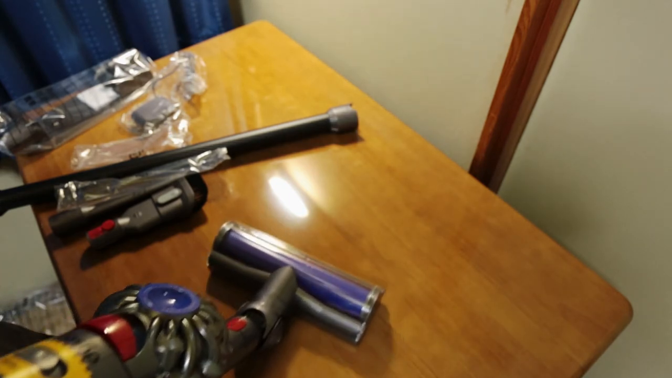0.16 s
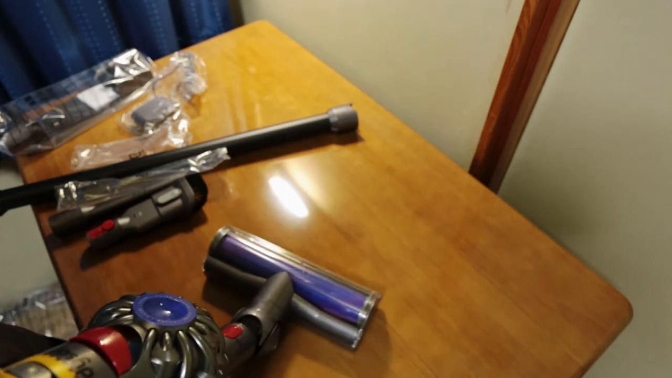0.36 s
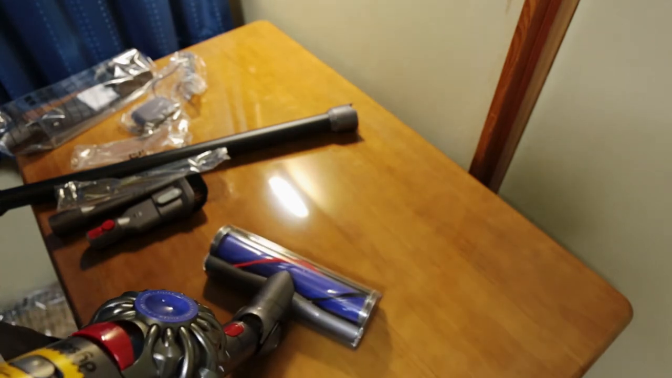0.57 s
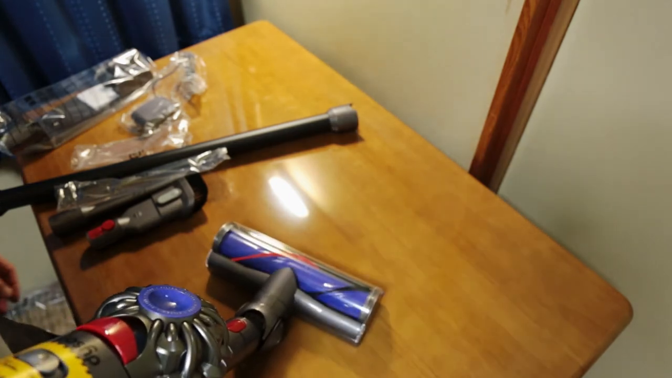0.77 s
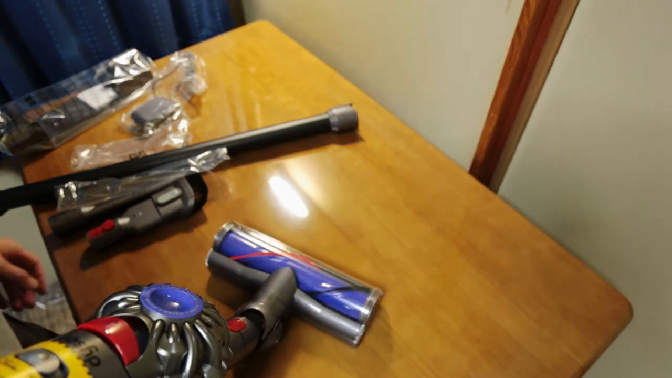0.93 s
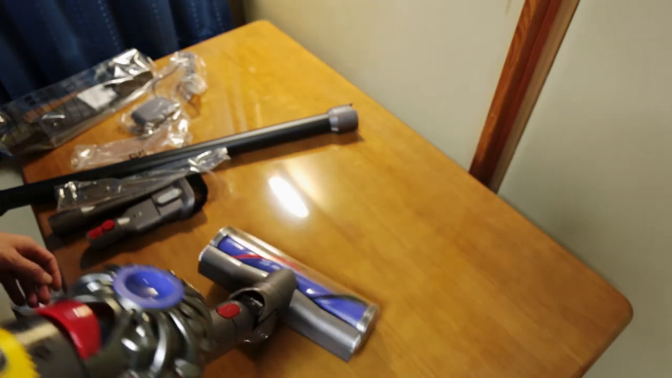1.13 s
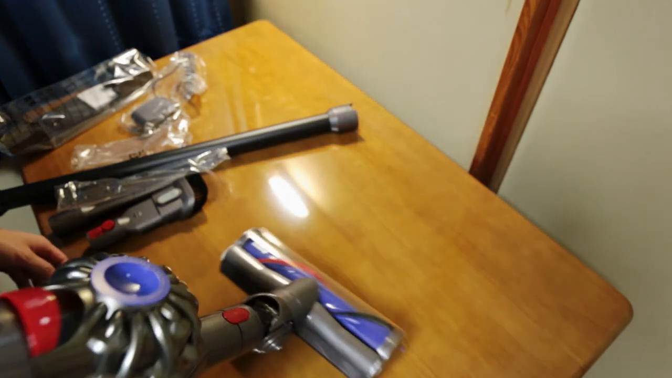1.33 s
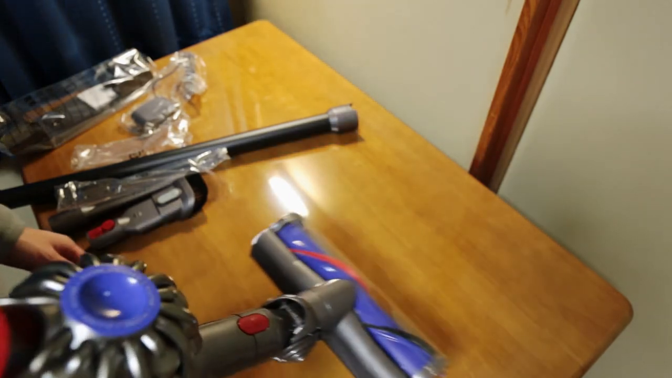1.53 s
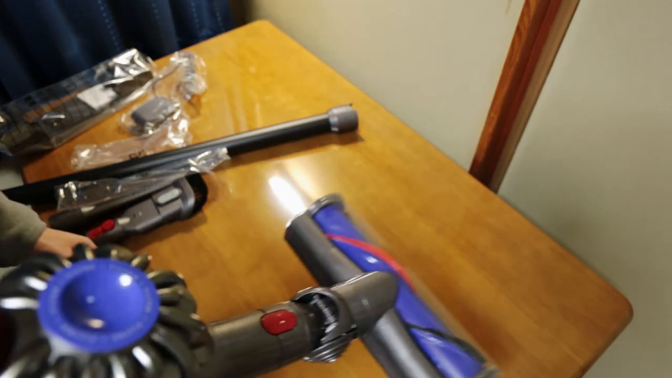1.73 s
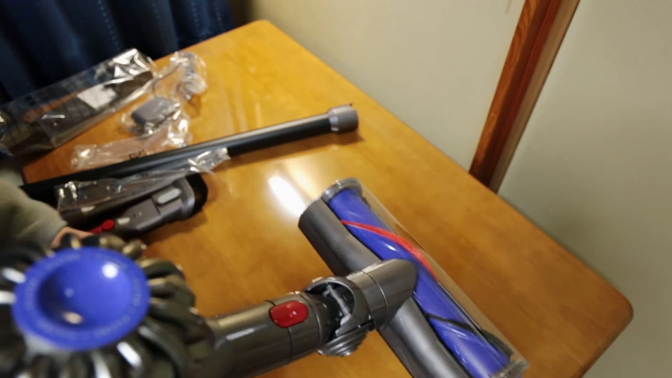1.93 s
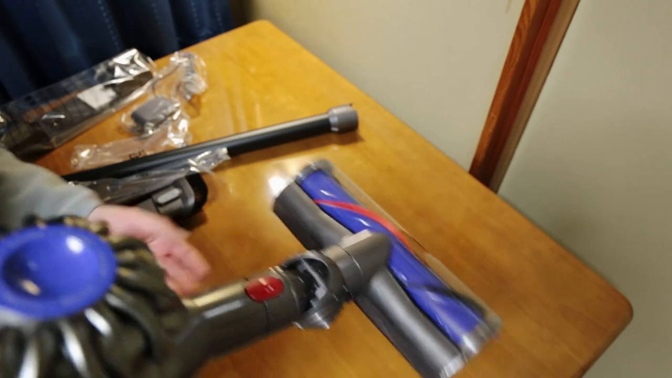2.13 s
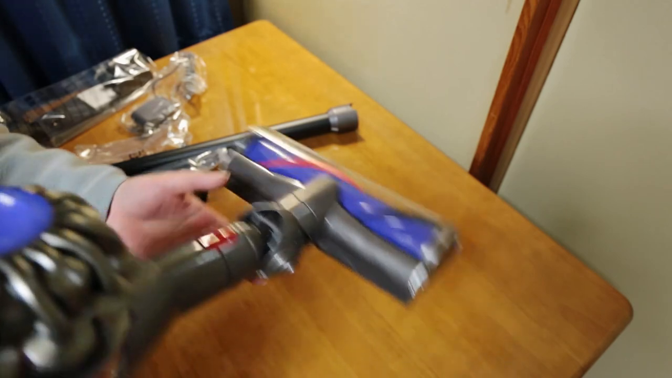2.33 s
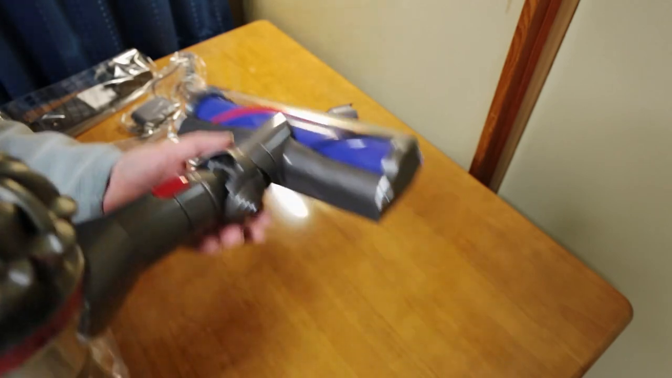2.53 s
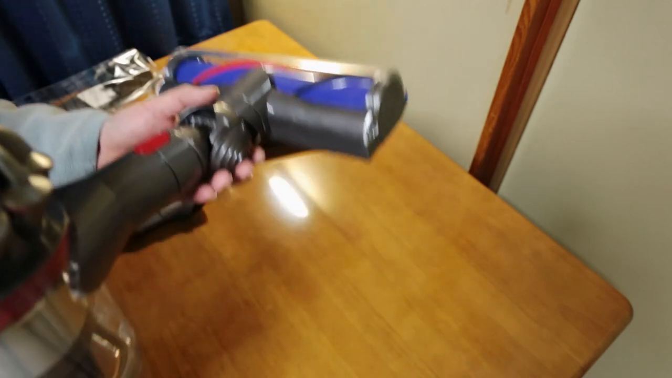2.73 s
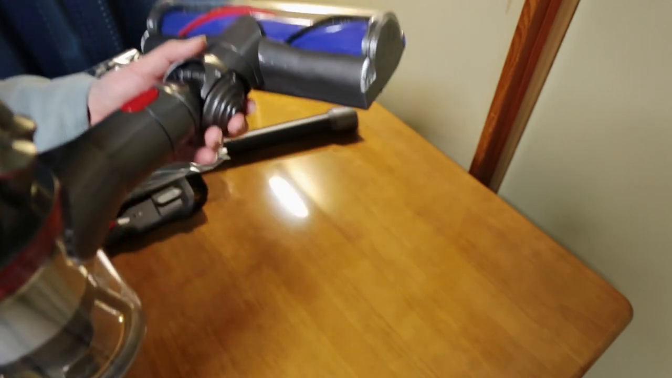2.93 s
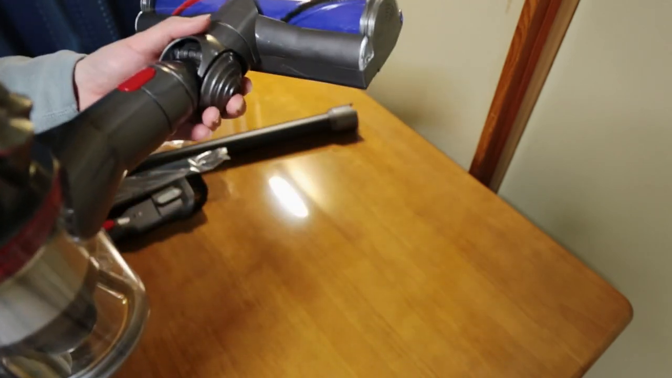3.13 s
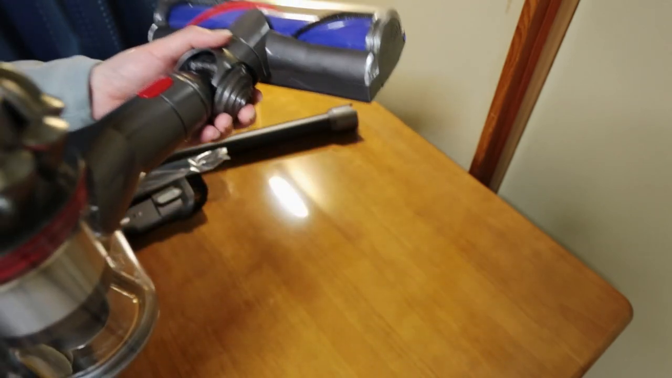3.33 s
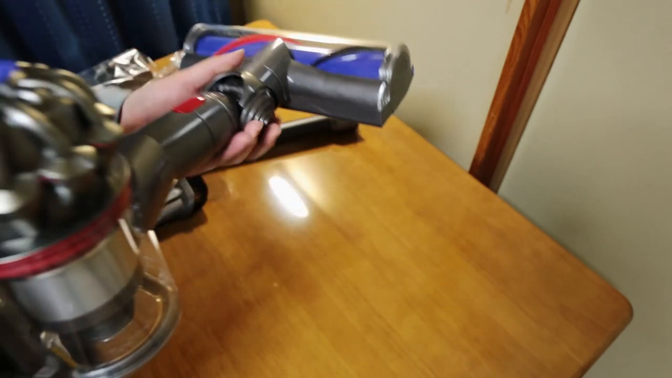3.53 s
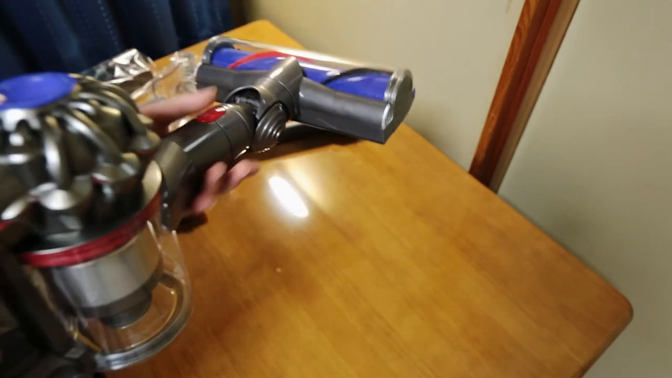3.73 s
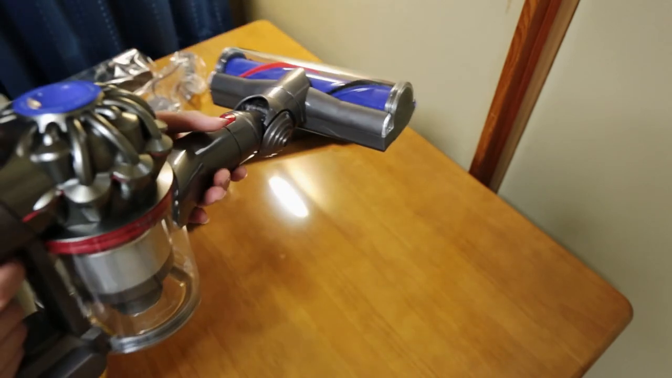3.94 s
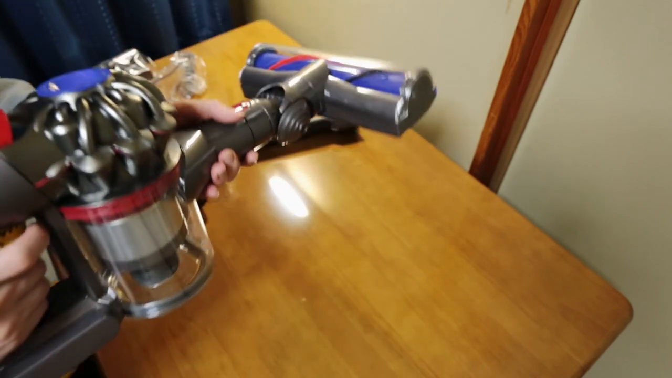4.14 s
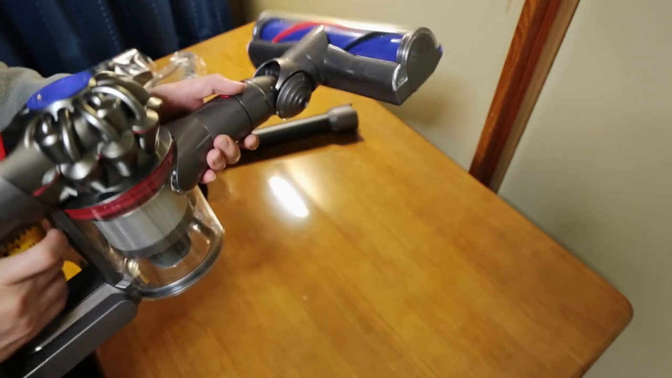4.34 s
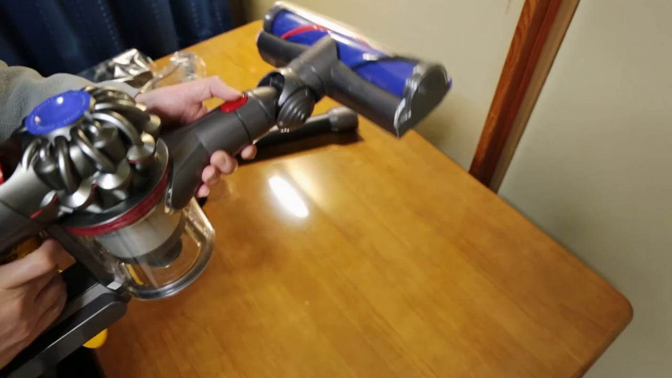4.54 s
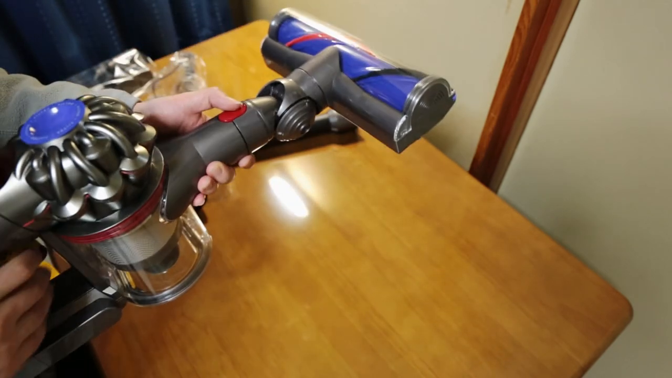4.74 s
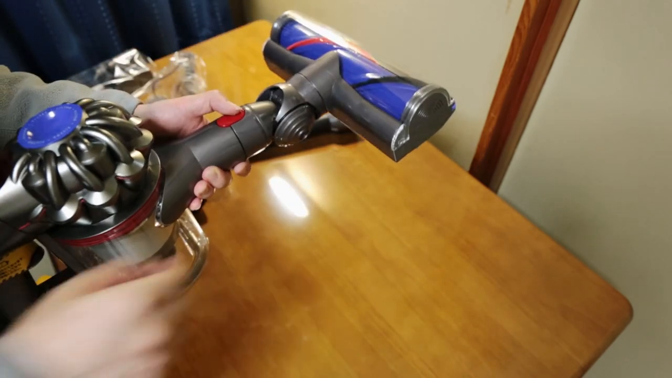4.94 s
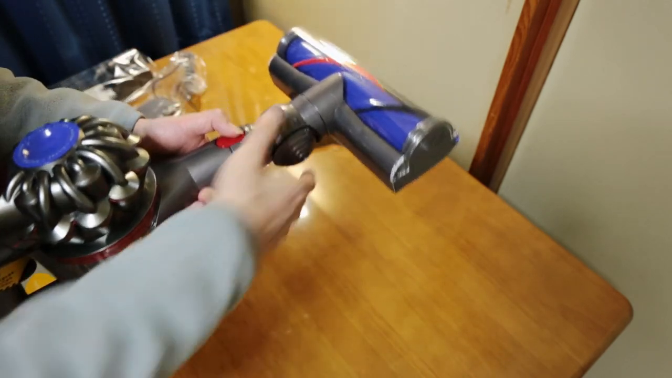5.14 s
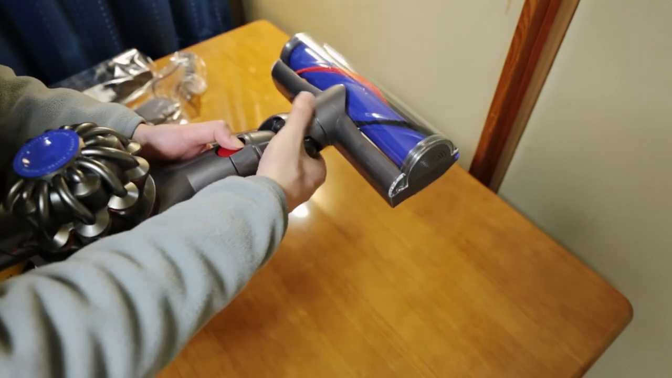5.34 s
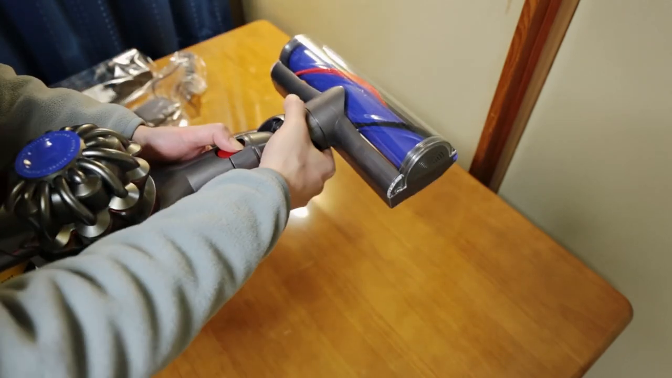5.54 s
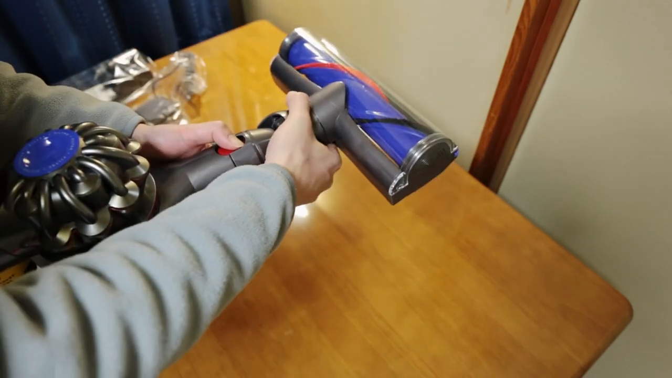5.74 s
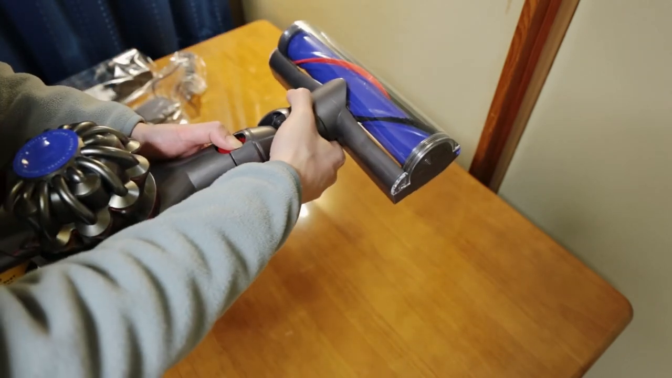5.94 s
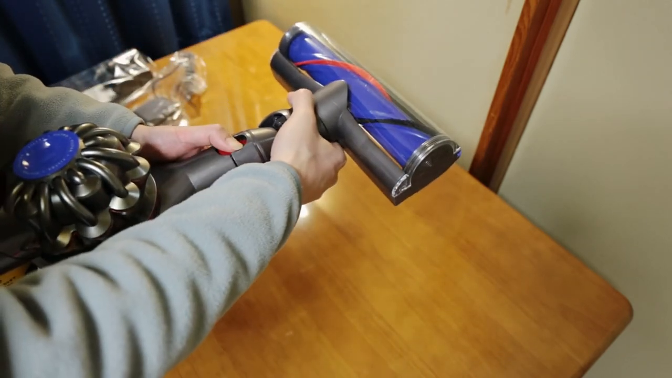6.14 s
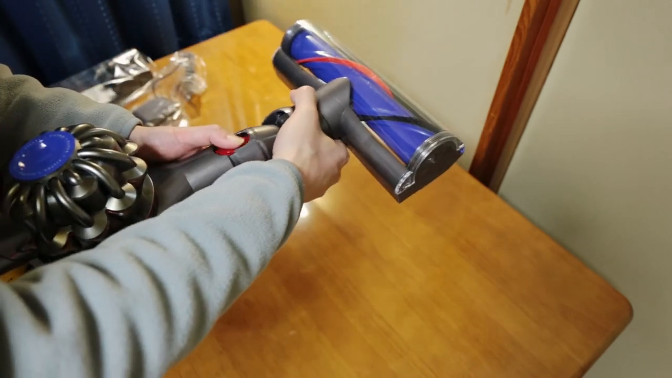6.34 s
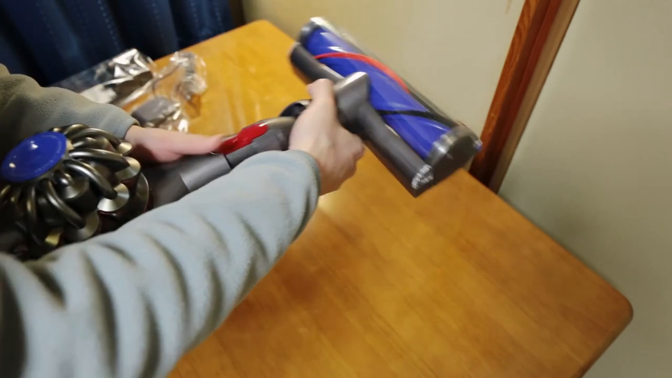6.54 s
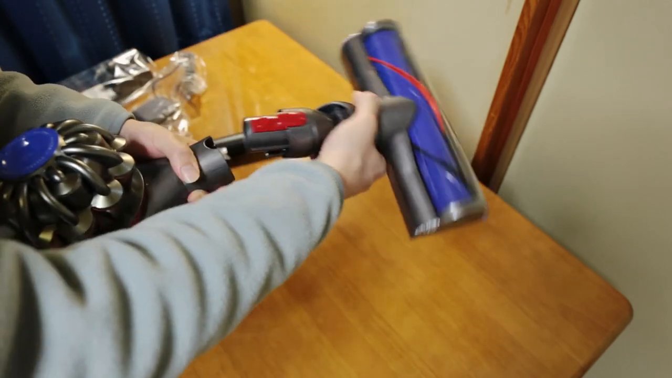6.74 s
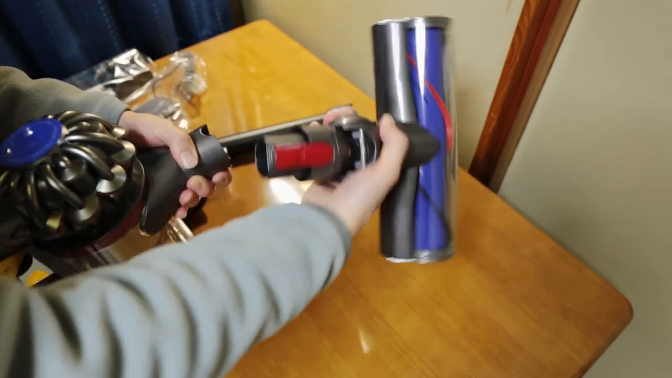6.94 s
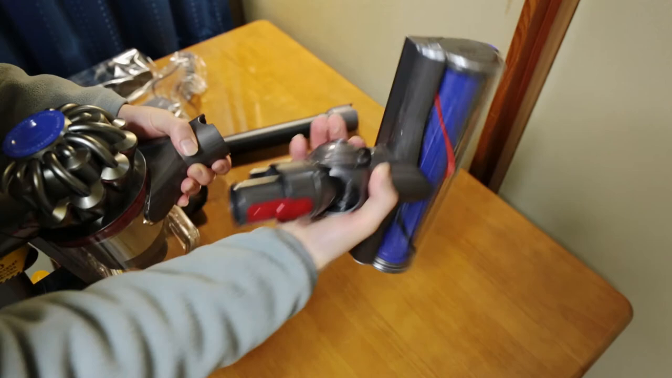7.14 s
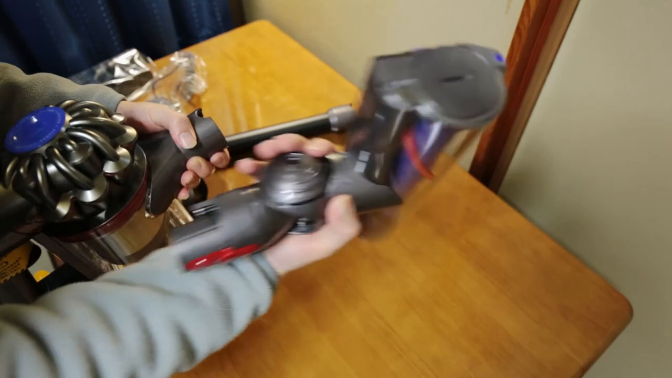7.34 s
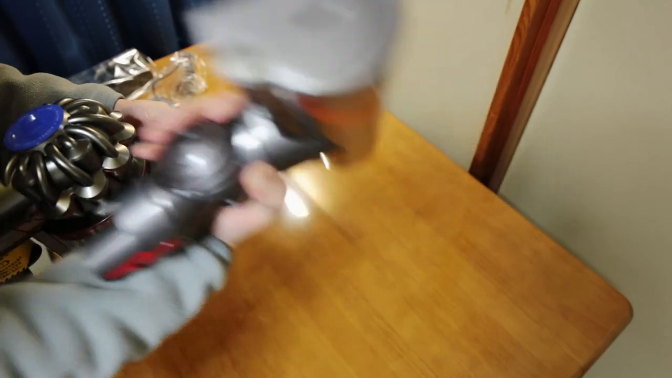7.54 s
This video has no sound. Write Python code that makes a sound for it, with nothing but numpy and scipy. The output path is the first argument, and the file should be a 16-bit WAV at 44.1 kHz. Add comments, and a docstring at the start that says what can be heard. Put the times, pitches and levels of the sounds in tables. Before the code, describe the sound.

Heard up close in a small room, the whine and airy rush of a stick vacuum cut off and fall in pitch, dying away in about a second. After a brief rub of fingers, the plastic neck clacks loudly, then creaks as it twists. Scattered light taps and soft handling bumps lead to two short bursts of clicking, the last with a scrape as the floor head comes off.

```python
"""A cordless stick vacuum whines and rushes over a wooden table in a small room, then is switched off
and glides down to a stop. Fan and gears make the tones, turbulence in the ducts the rush of air.
Fingers slide over the plastic shell in tiny slips, the swivel neck clacks and creaks as the floor head
is lifted, and the head is unlatched and pulled off, each knock briefly ringing the hollow housing."""
import sys
import numpy as np
from scipy import signal
from scipy.fft import rfft, irfft, next_fast_len
from scipy.io import wavfile

SR = 44100
rng = np.random.default_rng(int(sys.argv[2]) if len(sys.argv) > 2 else 0)


def waveform_to_disk(signal):
    """Save audio, clipped to [-1, 1], as 16-bit WAV at the path in sys.argv[1]."""
    frames = np.transpose(np.atleast_2d(signal))
    scaled = np.clip(frames, -1, 1) * 32767
    samples = np.round(scaled).astype(np.int16)
    wavfile.write(sys.argv[1], SR, samples)


N = 334719
TIME = np.arange(N) / SR

# The bright hiss of rubbing skin or bristles. Each row: frequency in Hz, relative density in dB.
FRICTION_HISS = [(200, -50), (3500, -5.5), (5500, -6.5), (7000, -4), (9000, 1.5), (12000, -8.5),
                 (16000, -12)]


def motor():
    """Fan and gears whine under power; with the drive cut, the rotor's coasting tones take over."""
    # Fan tones. Each row: multiple of the shaft rate, level in dB.
    fan_orders = [(1, -35.5), (2, -72), (3, -52.5), (4, -52), (5, -45), (7, -29), (8, -39.5), (14, -45)]
    shaft = shaft_rate()
    driven = np.interp(TIME, [.235, .275], [1, 0])
    fan = tones(shaft, fan_orders, waver_db=-2.9) * driven
    return fan + gear_whine(driven) + coasting_rotor(shaft, driven)


def gear_whine(driven, fade_power=0.51, unloaded_db=-19):
    """Meshing teeth whine, drop in level once unloaded and fade as the brush bar slows."""
    # Gear tones and sidebands. Each row: multiple of the brush rate, level under power in dB.
    gear_orders = [(1, -49), (6.08, -40.5), (9.7, -38.5), (13, -47), (14, -39.5), (23.5, -72), (24, -25.5),
                   (25, -23.5), (25.5, -43.5), (26, -31.5), (26.44, -34.5), (27, -33.5), (27.46, -37),
                   (45.46, -42), (58.78, -45)]
    brush = brush_rate()
    # the teeth bite hardest once a turn, so their sidebands swell together
    whine = tones(brush, gear_orders, waver_db=1.5, phase_spread=1.0)
    slowing = (brush / brush[0]) ** fade_power
    return whine * slowing * from_db(unloaded_db * (1 - driven)) * np.interp(TIME, [.55, .62], [1, 0])


def coasting_rotor(shaft, driven):
    """A few partials of the freewheeling rotor glide down through the peaks and dips of the housing and the
    room."""
    # Rotor partials. Each row: multiple of the shaft rate, relative level in dB, favoured speed in
    # turns per second, loss in dB per octave away from that speed.
    rotor_orders = [(1, -33.5, 450, 11.5), (4, -32, 120, 1.5), (7, -36, 550, 9), (12, -31.5, 111, 36)]
    # Peaks and dips of the housing and the room. Each row: frequency in Hz, gain in dB.
    coast_response = [(160, -26), (250, -27), (310, -0.5), (355, -13.5), (395, -6.5), (430, -10), (475, 3),
                      (560, -11), (780, -13.5), (990, -7.5), (1300, -14), (1650, -19), (2250, -10), (2650, -4),
                      (3700, -14), (4080, 7), (4450, -12), (6100, -12)]
    rotor = 0
    for order, db, best_hz, loss_db in rotor_orders:
        octaves_away = np.abs(np.log2((shaft + 1) / best_hz))
        gain = from_db(at_hz(coast_response, order * shaft) - loss_db * octaves_away)
        rotor = rotor + tones(shaft, [(order, db)], waver_db=4.5) * gain
    coasting = (1 - driven) * np.interp(TIME, [1.1, 1.2], [1, 0])
    return room(rotor * coasting, wet_db=-14)


def shaft_rate(full_hz=872.2, drag_hz=269.1, coast_s=.7864, stop_s=1.247):
    """Full speed, then a coast: air drag brakes the rotor above drag_hz, bearing friction below it."""
    angle = np.clip((stop_s - TIME) / coast_s, 0, np.arctan(full_hz / drag_hz))
    return drag_hz * np.tan(angle)


def brush_rate(full_hz=87.65, switch_off_s=.24, stop_s=.63):
    """After switch-off the brush bar is braked evenly by its gears."""
    return np.interp(TIME, [switch_off_s, stop_s], [full_hz, 0])


def air(split_hz=900, gust_db=2.74):
    """Turbulence in the ducts: the hiss dies sooner than the low roar."""
    # Rushing air with the duct's resonances. Each row: frequency in Hz, relative density in dB.
    duct_colour = [(30, -7), (60, -30), (87, -6), (120, -27), (150, -4.5), (175, -21), (212, -1),
                   (250, -13.5), (305, -8), (510, -4.5), (590, -12), (670, -9), (760, -18), (870, -14),
                   (1230, -10.5), (1750, -13), (2200, -7.5), (2550, -14.5), (4100, -15.5), (5400, -21.5),
                   (6300, -17.5), (7400, -19), (9800, -18), (15800, -31.5)]
    # The air flow dying away. Each row: time in seconds, roar gain in dB, hiss gain in dB.
    flow = [(0, -20, -21.5), (.27, -20.5, -23), (.33, -24, -28), (.44, -19.5, -32), (.56, -32.5, -43.5),
            (.67, -37, -51.5), (.8, -40.5, -52.5), (1.1, -62, -69), (1.4, -80, -94)]
    times, roar_db, hiss_db = np.transpose(flow)
    rush = noise(duct_colour)
    roar_gain = from_db(np.interp(TIME, times, roar_db) + gust_db * drift(39.9))
    hiss_gain = from_db(np.interp(TIME, times, hiss_db))
    roar = band(rush, split_hz, "low", order=3) * roar_gain
    return roar + band(rush, split_hz, "high", order=3) * hiss_gain


def floor_head(bristle_focus=6.2, swish_db=-37, ring_db=-45):
    """The bristles swish once a turn, ever slower, while one mode of the housing sings along."""
    brush = brush_rate()
    strokes = np.abs(np.sin(np.pi * np.cumsum(brush) / SR)) ** bristle_focus * (brush > 0)
    swish = noise(FRICTION_HISS) * strokes * swell(peak_s=0.48, rise_s=0.18, fall_s=0.32)
    ring = narrow_noise(hz=1680, width_hz=70) * swell(peak_s=0.56, rise_s=.22, fall_s=0.29)
    return from_db(swish_db) * swish + from_db(ring_db) * ring


def knocks(level_db=-1, light_db=-40, light_t60_s=0.079, damping_per_db=0.0732, gripped_s=5.2):
    """Neck, latch and housing clack: each contact has a thud, a hollow ring, a clack and a snap."""
    # Plastic parts meeting. Each row: start in seconds, relative level in dB, brightness in dB per band,
    # ring of the struck spot in Hz, sharpness in dB. The neck swings from 2.3 s and is twisted from
    # 3.5 s; the head is gripped from 5.1 s and the latch gives from 6.3 s.
    contacts = [(.9855, -43.5, -6, 1480, 1), (1.162, -36, 2, 860, 1), (1.2191, -32.5, 5, 3480, -27),
                (2.312, -36, 0.5, 1870, 15), (2.3776, -15.5, 4, 2790, -0.5), (2.3845, -27, 5.5, 1430, 13),
                (2.4154, -26.5, -6, 1000, 8), (2.4296, -30.5, -1.5, 800, -1),
                (2.4366, -37.5, 7.5, 1540, -1), (2.4869, -27, 2, 2470, -3), (2.5545, -30.5, -7, 1010, -6),
                (2.6277, -15, 5, 2930, 1), (2.8484, -42.5, 7.5, 1440, 20), (2.986, -52.5, -6, 517, 28),
                (3.0848, -51.5, -4.5, 1760, 5), (3.1328, -51.5, 2, 1510, 31), (3.4617, -44.5, -4.5, 900, 9),
                (3.6354, -36, 0.5, 2410, -9), (3.7023, -34, -3, 875, 14), (3.7191, -31.5, -3, 2410, 14),
                (3.7413, -33.5, -5, 920, 6), (3.7565, -32, -4.5, 905, 10), (3.796, -37, -4, 1780, -1),
                (3.861, -51.5, -10, 1340, 23), (4.1208, -38, 1.5, 1210, 11), (4.3109, -38.5, 4.5, 1500, 27),
                (4.3646, -47, 5, 2300, 10), (4.4597, -49.5, 3, 2860, 18), (4.6524, -45, 2.5, 2720, -1),
                (5.099, -39.5, -3, 1575, 11), (5.2847, -35, 0, 2630, -6), (5.29, -28, 4, 2910, -3),
                (5.3032, -26, 3, 2300, 9), (5.337, -35, -3, 2310, 16), (5.37, -27.5, 2.5, 2820, -17),
                (5.3816, -32.5, 2.5, 2700, -8), (5.4042, -37, 1, 2330, -11), (5.4161, -38, -1.5, 2750, -12),
                (5.549, -50.5, -7.5, 866, 4), (5.607, -44, -7, 1530, 8), (5.6533, -38.5, -2, 2460, 14),
                (5.7428, -38, -1, 1620, 11), (5.8584, -49.5, -5, 2250, 14), (6.001, -37.5, 1.5, 2010, 7),
                (6.0984, -42.5, -3.5, 2000, 19), (6.2634, -31, 6, 2050, 7), (6.394, -49, 15, 10200, 12),
                (6.409, -41, 8.5, 3840, 5), (6.498, -41, -3, 2250, 3), (6.5082, -29, 0.5, 2050, 25),
                (6.525, -32.5, -3, 1550, 20), (6.536, -27.5, 5.5, 2320, 5), (6.6392, -42.5, -2, 2100, 2),
                (6.8662, -43, 0.5, 1095, 5), (7.0167, -55.5, -11, 1280, 11), (7.387, -51.5, 7, 3190, 9)]
    out = np.zeros(N + SR)
    for start_s, db, bright_db, spot_hz, sharp_db in list(contacts) + strain_ticks():
        hollow_db, snap_db = db - 2 - bright_db, db - 9.5 + bright_db
        thud_db = -19.5 + 0.81 * hollow_db   # the thud grows more slowly than the blow
        if start_s > gripped_s:   # the second hand damps the head
            hollow_db, snap_db = hollow_db - 4, snap_db - 3
        # hard blows, caught by the hand, die sooner
        t60 = light_t60_s * np.exp(-damping_per_db * (db - light_db))
        hit = knock([thud_db, hollow_db, db, snap_db], spot_hz, t60, sharp_db)
        start = round(start_s * SR)
        out[start:start + len(hit)] += hit
    return from_db(level_db) * out[:N]


def knock(levels_db, spot_hz, t60, sharp_db, shell_db=-13, spot_db=-9, rise_s=0.00036, crack_s=.0012):
    """A crack, then crowded short resonances, the struck spot and the housing ring out."""
    # The colour of a contact on plastic. Each row: frequency in Hz, relative density in dB.
    plastic = [(150, -46), (330, -0.5), (650, -12), (850, 0), (1800, 1), (3000, 2), (4200, -5), (5300, -8),
               (6500, -10), (9500, -9), (12000, -18.5), (16000, -22)]
    # Modes of the hand-damped housing. Each row: frequency in Hz, relative level in dB, T60 in seconds.
    shell_modes = [(828, -12, 0.066), (1017, -14, 0.057), (1510, -6, 0.054), (1650, -21, .09),
                   (1880, -29, 0.044), (2436, 2, 0.04), (2580, -25, 0.05), (3030, -2, 0.066),
                   (3360, -15, 0.055), (4120, -26, 0.064), (6350, -24, 0.077), (8800, -17, .04)]
    # Thud, hollow ring, clack and snap. Each row: lower edge in Hz, upper edge in Hz.
    bands = [(200, 700), (700, 1800), (1800, 4500), (4500, 16000)]
    t = TIME[:SR // 4]
    attack = slice(SR // 100)
    crowd = coloured(rng.standard_normal(len(t)), plastic)
    # the sharper the contact, the more the struck spot rings
    spot = np.sin(2 * np.pi * spot_hz * t) * from_db(spot_db + 0.44 * sharp_db - 60 * t / t60)
    shell = 0
    for hz, db, mode_t60 in shell_modes:
        decay = from_db(shell_db + db + rng.normal(0, 1.17) - 60 * t / mode_t60)
        shell = shell + decay * np.sin(2 * np.pi * hz * t) * rng.choice([-1, 1])
    out = 0
    for k, (edges, db, t60_scale) in enumerate(zip(bands, levels_db, [1.1, 1, .9, .99])):
        # a sharp contact starts at once and overshoots, a soft one builds up; the treble comes first
        sharp = from_db(sharp_db + 3 * (k - 4))
        onset = (1 + sharp * np.exp(-t / crack_s)) * (1 - np.exp(-t * sharp / rise_s))
        ring = crowd * from_db(-60 * t / (t60 * t60_scale)) + spot + shell
        part = band(onset * ring, edges, order=3)
        out = out + from_db(db) * part / np.sqrt(np.mean(part[attack] ** 2))
    return out


def strain_ticks(spread_db=3, bright_spread_db=4, spot_hz=(900, 2800), sharp_db=6):
    """A strained joint ticks faintly at uneven moments; gives rows of contacts for the knocks."""
    # Spells of strain. Each row: start and end in seconds, ticks per second, relative level in dB.
    strains = [(3.567, 3.95, 30, -51), (4.228, 4.29, 55, -51)]
    return [(s + rng.random() / per_s, db + rng.normal(0, spread_db),
             rng.normal(0, bright_spread_db), rng.uniform(*spot_hz), sharp_db)
            for start, end, per_s, db in strains for s in np.arange(start, end, 1 / per_s)]


def friction(slips_per_s=900, slip_spread_db=4, scrape_db=-4, skin_db=-3):
    """Tiny uneven slips rattle the shell or the swivel while skin hisses over the plastic."""
    # Skin sliding on the shell, then twists of the neck.
    # Each row: peak time, rise and fall in seconds, scrape gain in dB, hiss gain in dB.
    slides = [(1.045, .05, 0.12, -41.5, -61), (1.226, 0.23, 0.082, -33, -36), (2.14, 0.6, 0.6, -56.5, -60),
              (4.83, 0.12, 0.032, -68, -45), (5.305, 0.022, .09, -40, -47), (6.405, 0.096, 0.2, -45, -54),
              (6.536, 0.0086, 0.017, -40, -29), (6.58, 0.13, 0.17, -47, -49)]
    twists = [(3.75, .14, 0.18, -29.5, -49), (3.97, .3, 0.61, -51, -64)]
    # The scraped shell, then the neck's dry joint. Each row: frequency in Hz, relative density in dB.
    shell_colour = [(200, -14), (600, -3.5), (900, 2), (1500, 0), (2800, 0.5), (4200, -6.5), (5500, -28),
                    (16000, -56)]
    joint_colour = [(120, -60), (200, -41), (312, -28), (384, -37), (451, -4.5), (762, -13), (908, 2),
                    (1540, -12), (2520, -4.5), (2860, -7), (3100, -18), (5490, -42), (9000, -36),
                    (11700, -60), (19800, -120)]
    size = next_fast_len(N)
    slipping = rng.random(size) < slips_per_s / SR
    strength = from_db(slip_spread_db * np.minimum(rng.exponential(1, size), 4))
    slips = slipping * strength * rng.choice([-1, 1], size)
    shell, joint = (from_db(scrape_db) * rms_one(room(coloured(slips, colour)[:N], wet_db=-1))
                    for colour in (shell_colour, joint_colour))
    skin = from_db(skin_db) * noise(FRICTION_HISS)
    return rubbed(slides, shell, skin) + rubbed(twists, joint, skin)


def handling(rumble_db=-2, tube_db=-2):
    """A shifting grip rumbles through the body and sets the air in the neck's tube booming."""
    # Hand movements. Each row: peak time, rise and fall in seconds, rumble gain in dB, tube gain in dB.
    grips = [(1.03, 0.043, 0.16, -46.5, -38), (1.18, 0.14, 0.26, -45.5, -47),
             (5.62, 0.47, 0.44, -57, -52.5), (6.08, 0.11, 0.13, -62, -51), (6.28, 0.067, 0.55, -62, -51),
             (6.538, .05, 0.059, -49, -44), (6.66, 0.062, 0.21, -72, -52), (6.97, 0.082, 0.16, -55.5, -68)]
    # The body's rumble, then the tube's boom. Each row: frequency in Hz, relative density in dB.
    rumble = [(25, -30), (50, 2), (85, -3), (135, 10), (200, -3), (400, -9), (2000, -80)]
    tube = [(100, -30), (270, -6.5), (340, 1.5), (395, -1), (480, -4.5), (800, -24), (4000, -80)]
    return rubbed(grips, from_db(rumble_db) * noise(rumble), from_db(tube_db) * noise(tube))


def soft_rub(hz=3900, width_hz=550, level_db=-62):
    """A thin rub as the hand reaches for the neck."""
    return from_db(level_db) * narrow_noise(hz, width_hz) * swell(peak_s=2.12, rise_s=0.54, fall_s=0.66)


def room(x, wet_db):
    """The small room adds a diffuse tail that dies sooner in the treble."""
    # The room's decay. Each row: frequency in Hz, T60 in seconds.
    decay_times = [(200, 0.32), (1000, 0.31), (3000, 0.21), (8000, 0.18), (15000, 0.1)]
    t = TIME[:SR // 2]
    edges = np.geomspace(120, 16000, 9)
    tail = 0
    for low, high in zip(edges, edges[1:]):
        t60 = at_hz(decay_times, np.sqrt(low * high))
        tail = tail + band(rng.standard_normal(len(t)), (low, high)) * from_db(-60 * t / t60)
    tail = tail * np.clip((t - .003) / 0.0033, 0, 1)   # opens with the tabletop's reflection
    return x + from_db(wet_db) * signal.fftconvolve(x, tail / np.linalg.norm(tail))[:N]


def background(level_db=-55):
    """A bed of low room tone and faint, uneven hiss."""
    # The colour of the bed. Each row: frequency in Hz, relative density in dB.
    room_tone = [(15, -45.5), (25, -20.5), (82, -4.5), (200, -6), (228, -14), (255, -11), (291, -10),
                 (392, -12.5), (449, -14), (654, -15.5), (1180, -17), (4100, -23.5), (5370, -31),
                 (11100, -23), (15800, -27)]
    # Narrow bands standing out of the hiss. Each row: centre in Hz, width in Hz, level in dB.
    hiss_bands = [(9220, 280, -72), (9930, 120, -76), (11080, 460, -70.5), (12450, 220, -79),
                  (14200, 450, -73.5)]
    bed = from_db(level_db) * noise(room_tone)
    return bed + sum(from_db(db) * narrow_noise(hz, width_hz) for hz, width_hz, db in hiss_bands)


def tones(rate, orders, waver_db, phase_spread=np.pi):
    """Partials locked to a turning shaft, each wavering in the air stream."""
    angle = 2 * np.pi * np.cumsum(rate) / SR
    return sum(np.sqrt(2) * from_db(db + waver_db * drift(34.06))
               * np.cos(order * angle + phase_spread * rng.uniform(-0.74, 1)) for order, db in orders)


def rubbed(movements, first, second):
    """Each movement swells two sounds, each to its own level."""
    return sum(swell(peak_s, rise_s, fall_s) * (first * from_db(first_db) + second * from_db(second_db))
               for peak_s, rise_s, fall_s, first_db, second_db in movements)


def swell(peak_s, rise_s, fall_s):
    """Gain of one movement: up by 20 dB in the rise time, down by 20 dB in the fall time."""
    from_peak = np.maximum((peak_s - TIME) / rise_s, (TIME - peak_s) / fall_s)
    return from_db(-20 * np.minimum(from_peak, 10))


def drift(rate):
    """A random wander through `rate` points a second; rms 1."""
    knots = rng.standard_normal(int(rate * N / SR) + 2)
    return rms_one(np.interp(TIME * rate, np.arange(len(knots)), knots))


def noise(spectrum):
    """Coloured noise for the whole scene."""
    return coloured(rng.standard_normal(next_fast_len(N)), spectrum)[:N]


def narrow_noise(hz, width_hz):
    """Noise in one resonance; rms 1."""
    return rms_one(band(rng.standard_normal(N), [hz - width_hz / 2, hz + width_hz / 2]))


def coloured(x, spectrum):
    """Give a steady signal a spectrum; rms 1."""
    hz = np.arange(len(x) // 2 + 1) * SR / len(x)
    return rms_one(irfft(rfft(x) * from_db(at_hz(spectrum, hz)), len(x)))


def band(x, hz, kind="band", order=2):
    """Butterworth filter."""
    return signal.sosfilt(signal.butter(order, np.clip(hz, 12, .45 * SR), kind, fs=SR, output="sos"), x)


def at_hz(points, hz):
    """Read a table on a log-frequency axis."""
    f, value = np.transpose(points)
    return np.interp(np.log(hz + 1), np.log(f), value)


def rms_one(x):
    """Scale to rms 1."""
    return x / np.sqrt(np.mean(x ** 2) + 1e-20)


def from_db(db):
    """Decibels to gain."""
    return 10 ** (np.asarray(db) / 20)


def scene():
    """Machine, hands and room are heard from one point, alike in both channels."""
    machine = motor() + air() + floor_head()
    hands = room(knocks(), wet_db=-10.0) + friction() + handling() + soft_rub()
    mono = machine + hands + background()
    return np.array([mono, mono])


def record(dry):
    """The deepest bass and the very top are cut."""
    low_cut_hz, high_cut_hz = 38, 15800
    lean = band(dry, low_cut_hz, "high", order=5)
    return signal.sosfilt(signal.ellip(10, .1, 80, high_cut_hz, fs=SR, output="sos"), lean)


dry = scene()
out = record(dry)
waveform_to_disk(out)
```